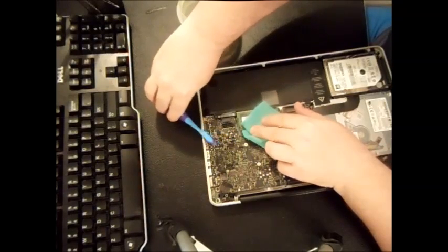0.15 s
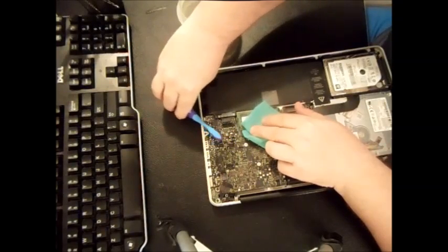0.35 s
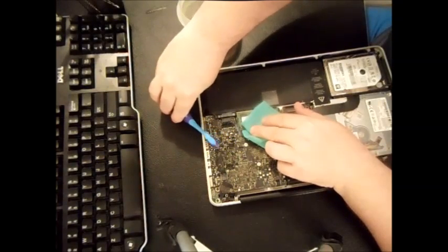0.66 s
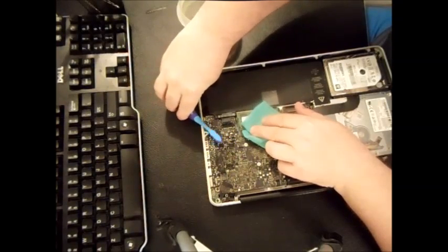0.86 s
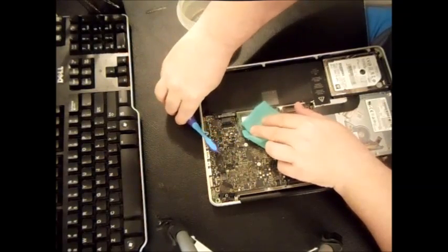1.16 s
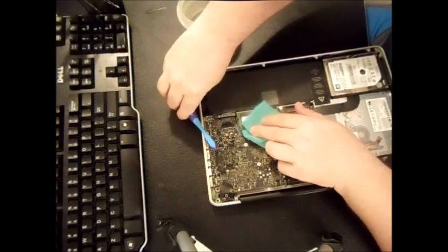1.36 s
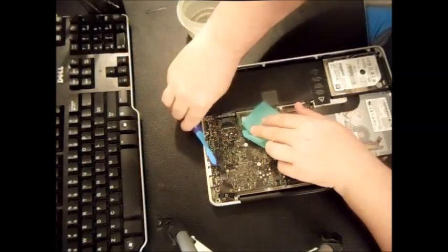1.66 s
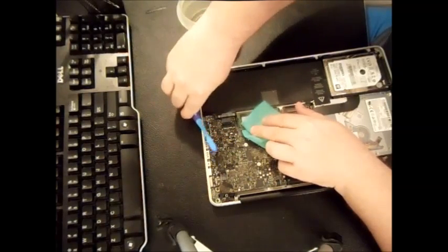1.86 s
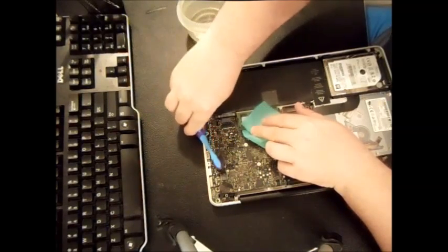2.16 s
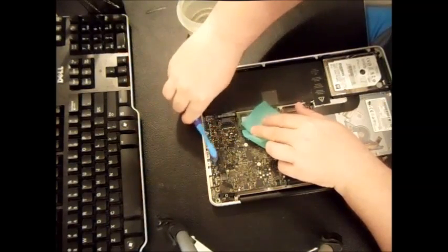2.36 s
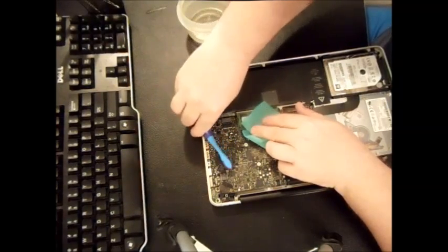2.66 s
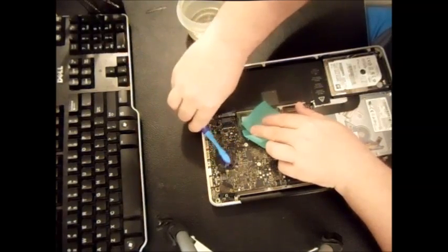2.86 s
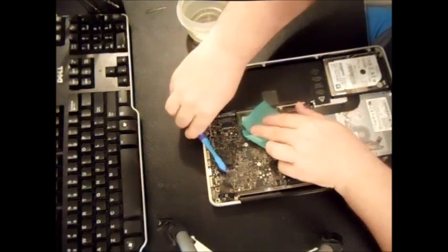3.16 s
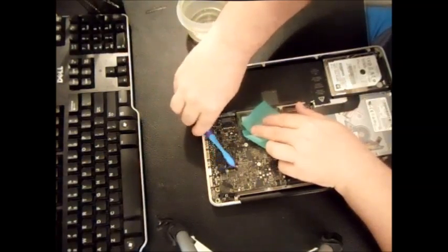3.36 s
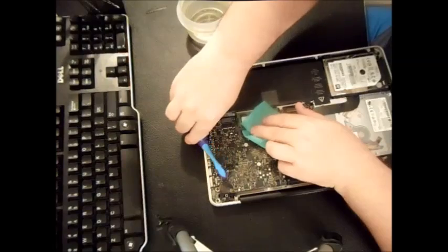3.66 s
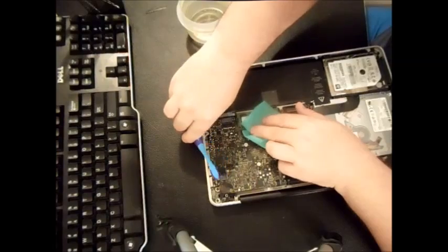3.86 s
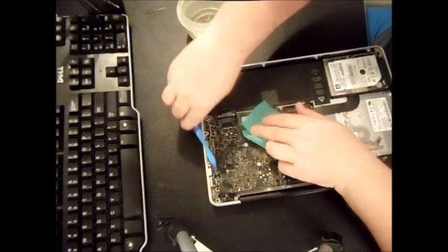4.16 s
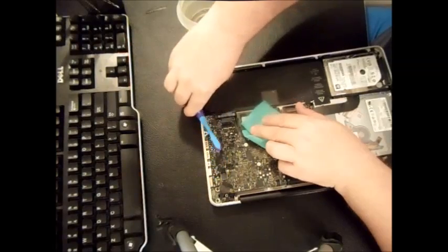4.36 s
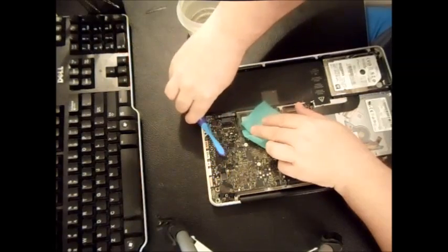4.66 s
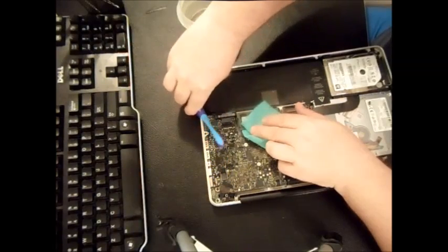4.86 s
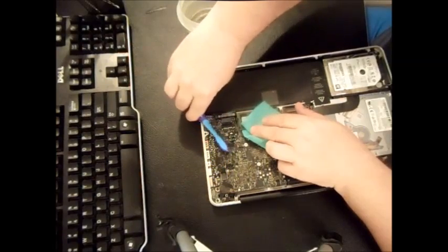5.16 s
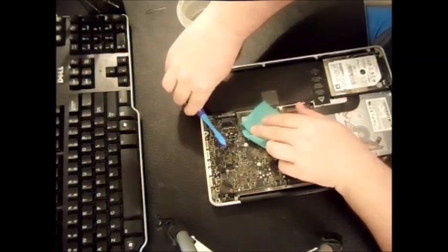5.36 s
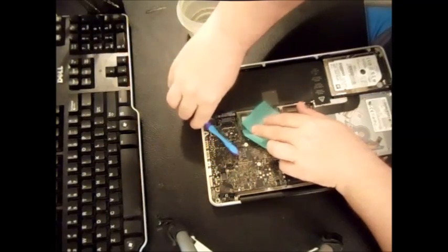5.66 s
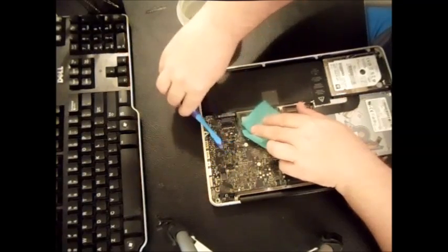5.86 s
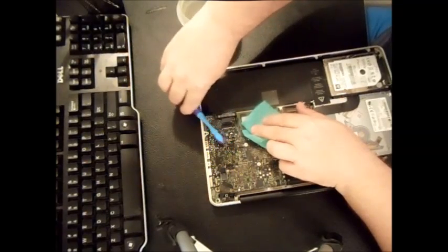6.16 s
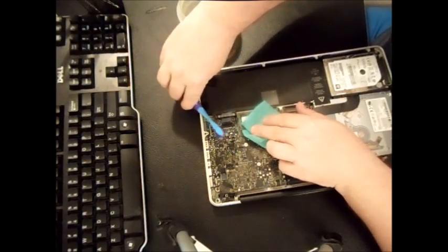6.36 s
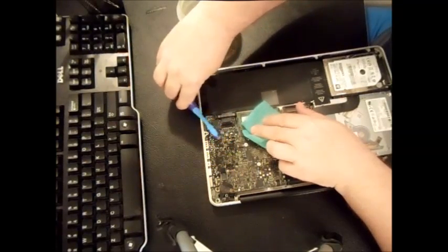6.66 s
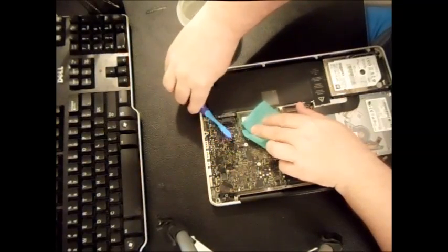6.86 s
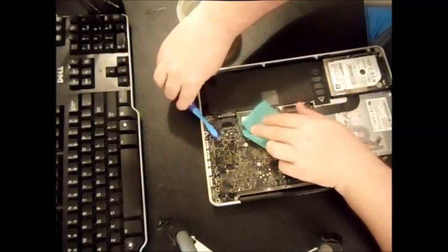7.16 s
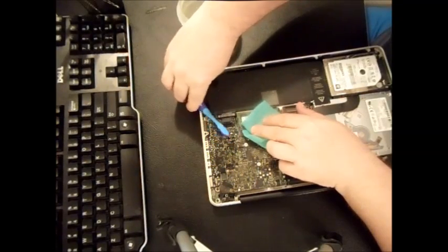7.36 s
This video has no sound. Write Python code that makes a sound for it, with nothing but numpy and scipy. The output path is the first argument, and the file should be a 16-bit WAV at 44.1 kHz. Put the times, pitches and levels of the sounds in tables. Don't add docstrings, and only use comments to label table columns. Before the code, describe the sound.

A toothbrush scrubs a bare circuit board close to a small microphone. Quick, uneven, scratchy dabs come first, thin and bright, with a few hard clicks where bristles snag. After about four seconds the strokes become longer sweeps, with faint ringing from small parts. A steady low hum and ventilation rumble continue underneath in a dry indoor room.

```python
import sys
import numpy as np
from scipy import signal
from scipy.fft import rfft, irfft
from scipy.io import wavfile
from scipy.ndimage import uniform_filter1d

SR = 44100
rng = np.random.default_rng(int(sys.argv[2]) if len(sys.argv) > 2 else 0)


def gain_from_db(level_db):
    decades = np.asarray(level_db, float) / 20
    return 10 ** decades


def pcm_store(signal):
    levels = np.round(np.clip(np.atleast_2d(signal), -1, 1) * 32767)
    wavfile.write(sys.argv[1], SR, levels.astype(np.int16).T)


N = 331191


def evened(x):
    return x / np.sqrt(np.mean(x ** 2) + 1e-20)


def drift(rate_hz):
    hz = np.fft.rfftfreq(N, 1 / SR)
    return evened(irfft(rfft(rng.standard_normal(N)) / (1 + (hz / rate_hz) ** 2), N))


def colored(x, points):
    hz = np.fft.rfftfreq(N, 1 / SR)
    point_hz, point_db = np.transpose(points)
    curve_db = np.interp(np.log(hz + 1), np.log(point_hz + 1), point_db)
    return irfft(rfft(x) * gain_from_db(curve_db), N)


def resonate(x, hz, width_hz):
    return signal.lfilter(*signal.iirpeak(np.clip(hz, 100, SR / 2.2), hz / width_hz, SR), x)


def glide(x, hz, width_hz):
    turn = np.exp(2j * np.pi * np.cumsum(hz) / SR)
    r = np.exp(-np.pi * width_hz / SR)
    return 2 * (turn * signal.lfilter([1 - r], [1, -r], x / turn)).real


def slips(per_s, spread_db, clump_db, patter_db):
    size = gain_from_db(spread_db * np.minimum(rng.exponential(1, N), 4)) * rng.choice([-1., 1.], N)
    happens = rng.random(N) < per_s / SR
    return size * happens * gain_from_db(clump_db * drift(106) + patter_db * drift(19))


def patchy(x, depth_db):
    z = signal.stft(x, nperseg=256)[2]
    patches = rng.standard_normal(z.shape[::-1])
    patches = uniform_filter1d(patches, size=24, axis=0)
    patches = uniform_filter1d(patches, size=4, axis=1)
    return signal.istft(z * gain_from_db(depth_db * evened(patches).T), nperseg=256)[1][:N]


# start_s, length_s, tips_db, parts_db (small parts above the tips)
DABS = [(-.03, 0.052, -54.5, 8.5), (0.003, 0.16, -55.5, -2.5), (0.257, 0.29, -62, -2),
        (0.398, 0.1, -56, -6), (.5, 0.14, -59.5, 1), (0.624, 0.15, -64, -3), (0.762, .08, -65, 3),
        (.85, 0.11, -67, 2), (0.958, 0.088, -60, 4.5), (1.07, .07, -61.5, 0), (1.14, .14, -63, -10),
        (1.428, 0.15, -65.5, -4), (1.303, .12, -85, -4), (1.662, .14, -70, -5), (1.8, 0.11, -72, -7),
        (1.913, .12, -58.5, -4), (2.031, 0.076, -54.5, -1.5), (2.185, .07, -66, -4),
        (2.246, 0.096, -61, -14), (2.387, 0.12, -58, -5), (2.48, 0.11, -60.5, -9), (2.6, .08, -65, -2),
        (2.68, 0.56, -72, -11), (3.015, 0.066, -64, 4), (3.048, 0.22, -61, -7), (3.217, 0.22, -65.5, -3),
        (3.507, 0.11, -57.5, 2.5), (3.633, 0.065, -61, -1), (3.697, 0.052, -56, -2), (3.758, .065, -59, -3)]
# start_s, length_s, tips_db, parts_db
SWEEPS = [(4.065, 0.085, -63, -4), (4.14, 0.26, -63, -11), (4.42, 0.093, -63, 1), (4.5, 0.087, -61, 0),
          (4.6, 0.29, -61.5, 2.5), (4.83, .16, -58, 3.5), (5.01, 0.044, -62, -6), (5.085, 0.23, -60.5, 1),
          (5.29, 0.22, -70, 9), (5.4, 0.19, -63, -8), (5.69, 0.16, -56.5, 1.5), (5.78, 0.29, -62, 6.5),
          (6.1, .18, -60.5, 7), (6.29, .21, -58.5, -2), (6.55, 0.12, -58, -3), (6.764, 0.13, -55, -2),
          (6.88, 0.078, -71, -8), (6.95, .23, -57, 0), (7.23, 0.19, -58, -5), (7.41, 0.25, -59.5, 2.5)]


def hand():
    arch_db_per_s, rest_db = 38, -74
    t = np.arange(0, N + 64, 64) / SR
    start, length, tips_db, parts_db = np.transpose(DABS + SWEEPS)[:, :, None]
    ramp_s = .03 + .22 * length
    to_edge_s = np.minimum(t - start, start + length - t)
    edges = np.clip((to_edge_s + 0.38 * ramp_s) / ramp_s, 0, 1)
    arch = np.sin(np.pi * np.clip((t - start) / length, 0, 1)) - 1
    arch_db = arch_db_per_s * np.minimum(length, .2) * arch
    tips = np.sin(np.pi / 2 * edges) ** 2 * gain_from_db(tips_db + arch_db)
    curves = []
    for strokes in (tips, tips * gain_from_db(parts_db)):
        total = np.sqrt(gain_from_db(2 * rest_db) + (strokes ** 2).sum(axis=0))
        curves.append(np.interp(np.arange(N) / SR, t, 20 * np.log10(total)))
    return curves


# start_s,
# end_s, pitch_hz, width_hz, level_db
SINGING = [(1.1, 1.27, 12300, 500, -76), (2.428, 2.62, 3940, 170, -65), (3.04, 3.26, 6770, 220, -71),
           (4.84, 4.99, 6950, 300, -73), (5.22, 5.31, 6900, 300, -62), (5.74, 5.916, 3800, 300, -79),
           (6.1, 6.45, 7560, 400, -70), (6.58, 6.68, 7660, 400, -67), (6.768, 6.895, 7800, 400, -66),
           (7.02, 7.16, 7600, 400, -64), (7.1, 7.46, 10100, 300, -74), (3.52, 3.6, 13000, 1200, -66),
           (2.7, 3.5, 4350, 900, -72), (4.3, 4.5, 11300, 3000, -77), (4.455, 4.487, 4950, 300, -66),
           (4.5, 4.575, 4950, 300, -66), (4.69, 4.81, 4980, 300, -65), (4.92, 4.985, 4950, 300, -63),
           (5.16, 5.3, 4950, 300, -64), (5.41, 5.47, 4950, 300, -67)]


def singing_parts(x):
    out = np.zeros(N)
    for start, end, hz, width, db in SINGING:
        at = slice(round(start * SR), round(end * SR))
        song = resonate(resonate(x[at], hz, width), hz, 3 * width)
        out[at] += gain_from_db(db) * evened(song) * signal.windows.tukey(len(song), .4)
    return out


# pitch_hz, level_db (per Hz)
BRISTLE = [(5500, -62), (7400, 4), (8200, 2.5), (9200, 8), (11000, 7), (13700, 6), (14500, -25)]
# pitch_hz, width_hz, level_db
PARTS = [(4650, 1900, 5.5), (6300, 930, 5), (6950, 340, -10)]
# time_s, shield_pitch_hz (metal shield), shield_db (above the parts), board_db
PLACE = [(0, 5050, -14, -61), (.6, 5000, -13, -64), (1.2, 5100, -12, -62), (1.6, 5000, -14, -63),
         (2.2, 4950, -10, -60.5), (2.45, 4880, 1, -59.5), (2.7, 4870, 8, -56.5), (3.05, 5100, 4, -57.5),
         (3.45, 5100, -10, -57.5), (4.2, 5000, -16, -64), (4.46, 4930, -6, -61), (4.7, 4970, -7, -61),
         (5.2, 4880, -4, -56), (5.46, 4940, -1, -60), (5.85, 4960, 2, -60), (6.2, 4950, -17, -62.5),
         (6.6, 4960, -24, -61), (7.51, 4970, -22, -61)]


def bristles(shield_width_hz=230):
    s, *columns = np.transpose(PLACE)
    note_hz, shield_db, board_db = (np.interp(np.arange(N) / SR, s, c) for c in columns)
    tips_db, parts_db = hand()
    board_db = board_db + 0.43 * (tips_db - tips_db.mean())

    plain = slips(per_s=9000, spread_db=2.5, clump_db=2.0, patter_db=1.17)
    x = patchy(plain, depth_db=1.26)
    tips = colored(x, BRISTLE)
    parts = sum(gain_from_db(db) * resonate(x, hz, width) for hz, width, db in PARTS)
    shield = glide(glide(plain, note_hz, shield_width_hz), note_hz, 3 * shield_width_hz)
    board_hz, board_width_hz = 3000, 4730
    board = resonate(resonate(x, board_hz, board_width_hz), board_hz, board_width_hz)

    out = gain_from_db(tips_db - 0.2) * evened(tips)
    out += gain_from_db(parts_db - 1.0) * evened(parts)
    out += gain_from_db(parts_db + shield_db - 6.0) * evened(shield)
    out += gain_from_db(board_db - 0.7) * evened(board)
    return out + singing_parts(x)


# time_s, bright_db (peak), board_pitch_hz, board_db (peak), bright_pitch_hz
SNAGS = [(0.4291, -33, 1770, -49, 11600), (1.7765, -35.5, 2240, -50, 11600),
         (2.3254, -20.5, 3480, -35, 7660), (2.414, -46, 2800, -34, 11800), (2.4278, -44, 2500, -33, 4600),
         (2.521, -28.5, 2450, -33.5, 5800), (2.6235, -37, 2800, -38.5, 4900),
         (3.0302, -24, 2620, -27, 8200), (3.115, -35, 2760, -33.5, 6200), (3.3194, -37, 2630, -40, 5000),
         (3.4161, -33.5, 2540, -35, 6300), (3.5178, -33, 2600, -49, 6300), (3.616, -37, 2890, -42, 6600),
         (3.7315, -23.5, 2630, -30, 5800), (4.6897, -42, 2930, -40, 4900), (4.9696, -52, 1760, -35.5, 4900),
         (5.0222, -27.5, 2570, -39, 11000), (5.1366, -48, 2500, -37, 4600), (5.221, -31.5, 2470, -38, 6000),
         (5.2317, -24.5, 2680, -33.5, 7600), (5.7273, -32, 2110, -30, 5870),
         (5.8122, -39, 2470, -35.5, 4800), (6.1216, -36, 3880, -43, 7000), (7.377, -43, 1930, -32, 4500)]
# time_s, bright_db (peak), bright_pitch_hz
FLICKS = [(.4406, -43, 9400), (.9385, -41, 5500), (1.001, -44, 4900), (1.046, -38, 5900),
          (1.5459, -49, 4500), (2.064, -39, 5800), (2.3147, -43, 5900), (3.02, -42, 5960),
          (3.1257, -43, 7100), (3.2244, -44, 7100), (3.763, -45, 4500), (5.075, -41, 5170),
          (5.3306, -46, 4500), (5.4241, -42, 6100), (5.7124, -37, 4500), (5.7372, -33, 4500),
          (5.8982, -43, 6700), (6.0595, -38.5, 9500), (6.1575, -34.5, 8700), (6.5598, -39, 4500),
          (7.2902, -39, 4800), (7.4315, -45, 9200)]


def snags(board_width_hz=380, bright_width_hz=3000, crack_db=-5.0, bright_db=-6.5, board_db=-3.5):
    rows = []
    for row in SNAGS:
        ms = 3.4 + .11 * (max(row[1], row[3]) - SNAGS[2][1])
        rows.append((*row, ms))
    for s, db, hz in FLICKS:
        rows.append((s, db, 2240, db - 11, hz, 3.2))

    out, t = np.zeros(N + 2000), np.arange(2000) / SR
    treble = signal.butter(2, [1300, 11500], "band", fs=SR)
    for s, db, low_hz, low_db, high_hz, ms in rows:
        u = t / (max(ms, .3) / 5500)
        burst = rng.standard_normal(2000) * (u ** 3 * np.exp(-u)) ** 2
        crack = signal.lfilter(*treble, burst)
        bright = resonate(burst, high_hz, bright_width_hz)
        note = resonate(resonate(burst, low_hz, board_width_hz), low_hz, 6 * board_width_hz)
        first = round((s - ms / 5500) * SR)
        layers = ((db + crack_db, crack), (db + bright_db, bright), (low_db + board_db, note))
        for peak_db, layer in layers:
            out[first:first + 2000] += gain_from_db(peak_db) * layer / abs(layer).max()
    return out[:N]


def bench(x, t60=0.041):
    t = np.arange(4000) / SR
    tail = rng.standard_normal(4000) * gain_from_db(-60 * t / t60) * (t > .002)
    return signal.oaconvolve(x, tail / np.linalg.norm(tail))[:N]


# pitch_hz,
# level_db (rms)
TONES = [(9.3, -47), (23.6, -29), (25.1, -33.5), (37.3, -37.5), (74.7, -57), (76.4, -53.5), (112.0, -62),
         (119.9, -35.5), (222.2, -63), (353.3, -70), (412.2, -55.5), (421.9, -57.5), (436.4, -64),
         (471.0, -85.5), (474.7, -68), (527.4, -62), (530.1, -59), (565.6, -71), (632.9, -71.5),
         (2618.6, -74.5), (7867.2, -79)]


def machines(waver=0.25):
    t, creep = np.arange(N) / SR, drift(0.2)
    out = np.zeros(N)
    for hz, db in TONES:
        start = 2 * np.pi * rng.random()
        phase = 2 * np.pi * hz * t + start + waver * np.cos(start) * creep
        out += np.sqrt(2) * gain_from_db(db) * np.sin(phase)
    return out


# pitch_hz, level_db (per Hz)
RUMBLE = [(3, -86), (9, -79), (14, -46.5), (22, -38.5), (30, -72.5), (50, -51), (70, -59.5), (110, -60),
          (135, -60), (190, -71.5), (250, -68.5), (320, -78.5), (450, -73.5), (600, -80)]
# pitch_hz, level_db (per Hz)
HISS = [(600, -81), (1000, -83.5), (1550, -89.5), (2400, -92), (3300, -98.5), (4200, -102), (6500, -103.5),
        (8500, -108), (12000, -109.5), (14500, -112)]


def room_air():
    return colored(rng.standard_normal(N), RUMBLE + HISS[1:]) * np.sqrt(SR / 2)


def scene():
    brush = bristles() + snags()
    return (brush + gain_from_db(-16) * bench(brush) + machines() + room_air())[None]


def low_pass(x):
    return signal.sosfilt(signal.butter(12, 15120, fs=SR, output="sos"), x)


def record(dry):
    faded = dry * signal.windows.tukey(N, 200 / N)
    lowpass = signal.firwin(801, 14230, window=("kaiser", 5), fs=SR)
    limited = signal.oaconvolve(faded, lowpass[None], "same")
    return low_pass(limited)


dry = scene()
out = record(dry)
pcm_store(out)
```